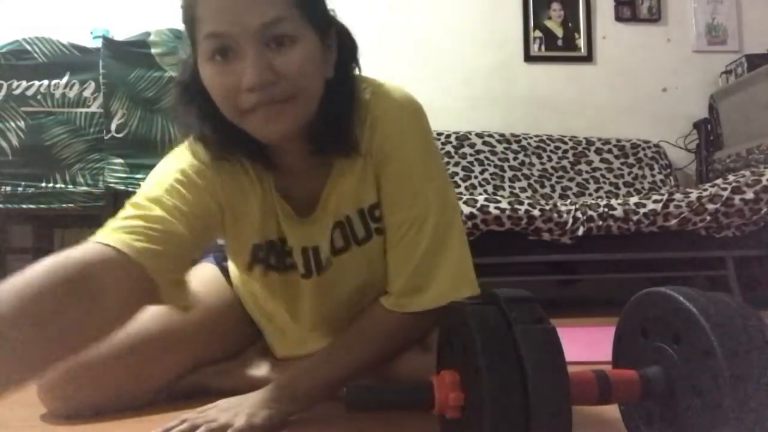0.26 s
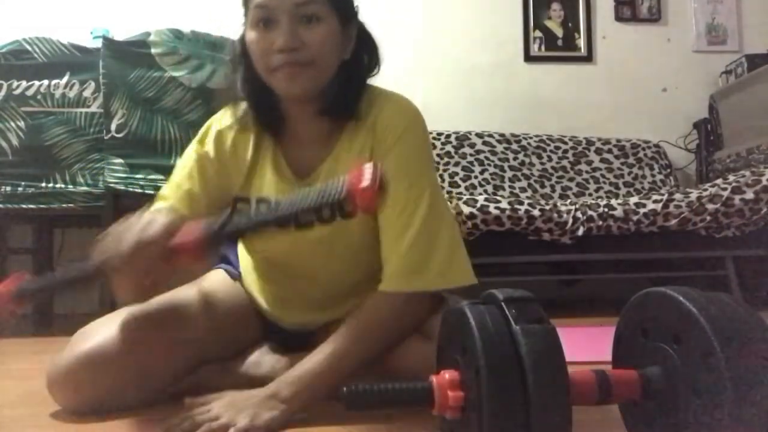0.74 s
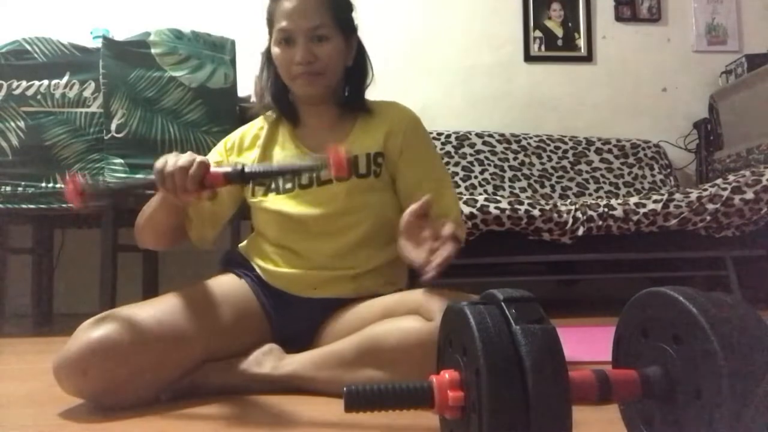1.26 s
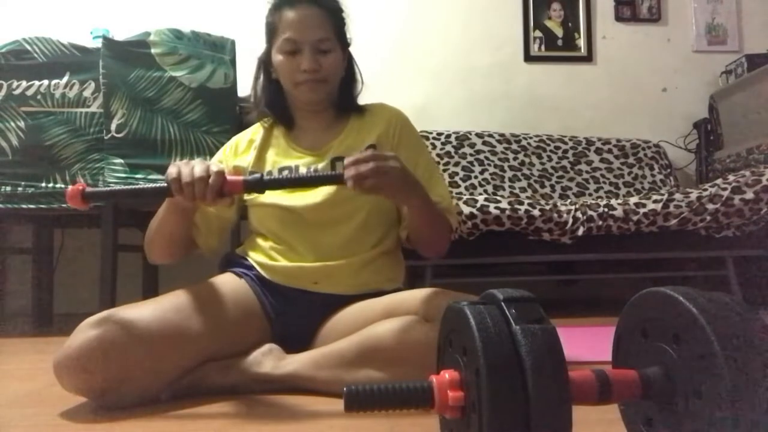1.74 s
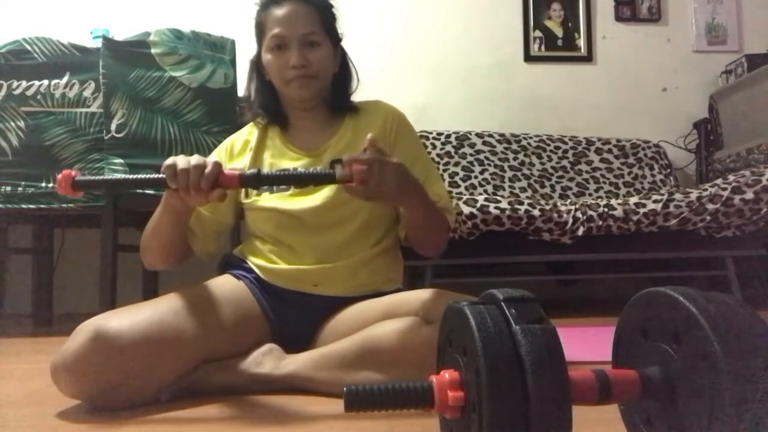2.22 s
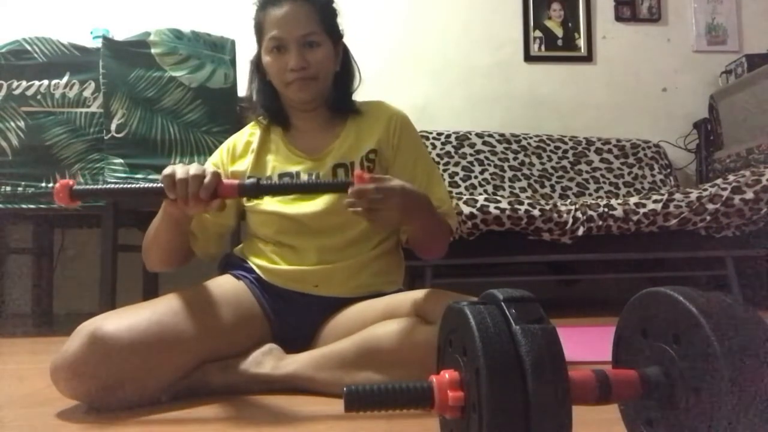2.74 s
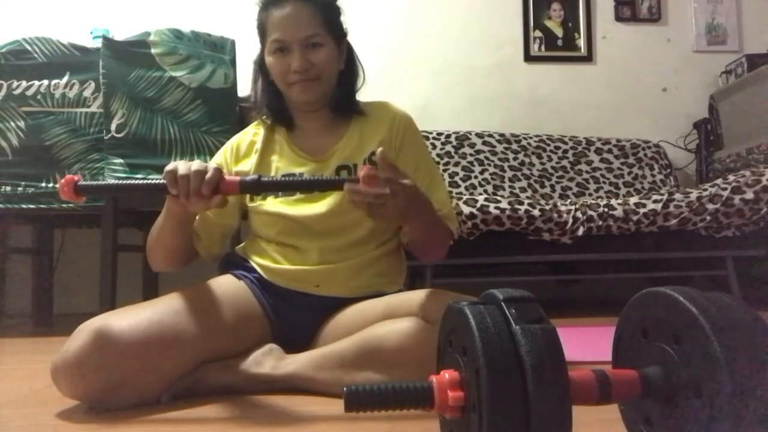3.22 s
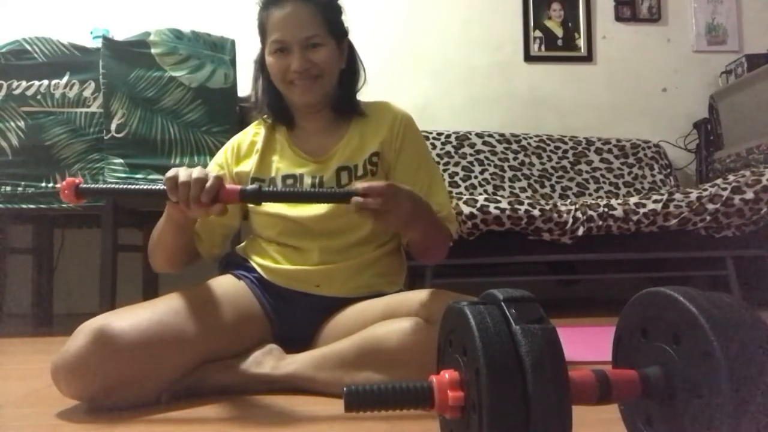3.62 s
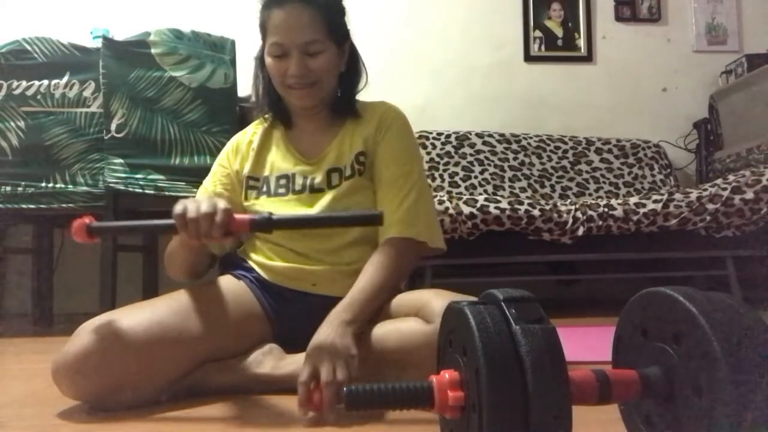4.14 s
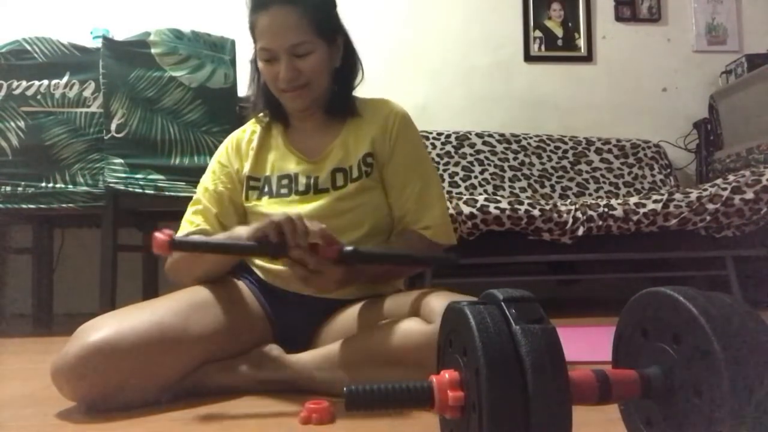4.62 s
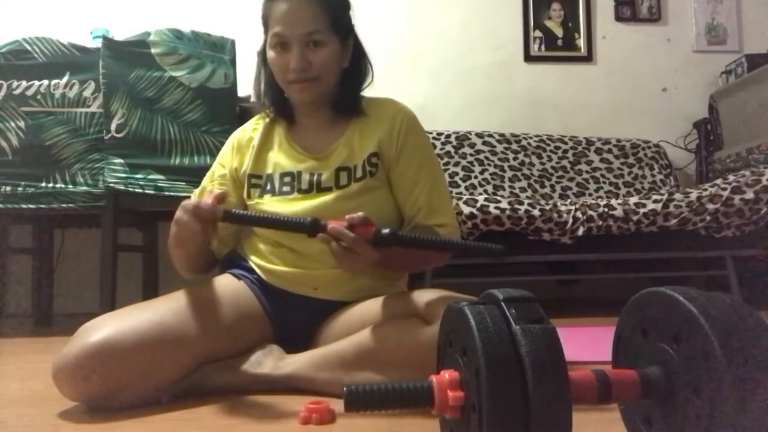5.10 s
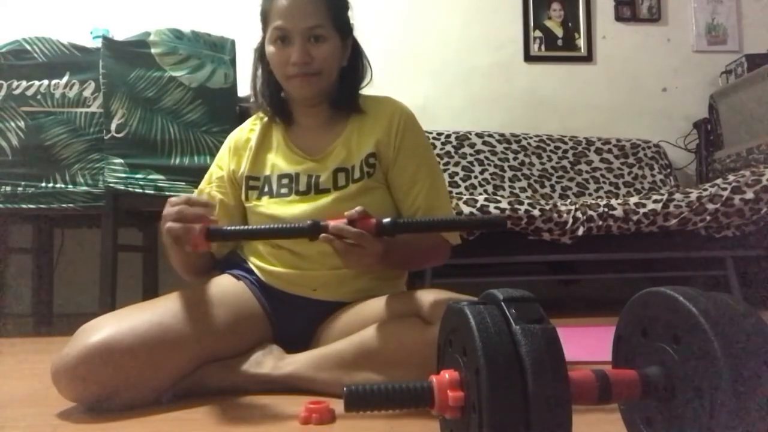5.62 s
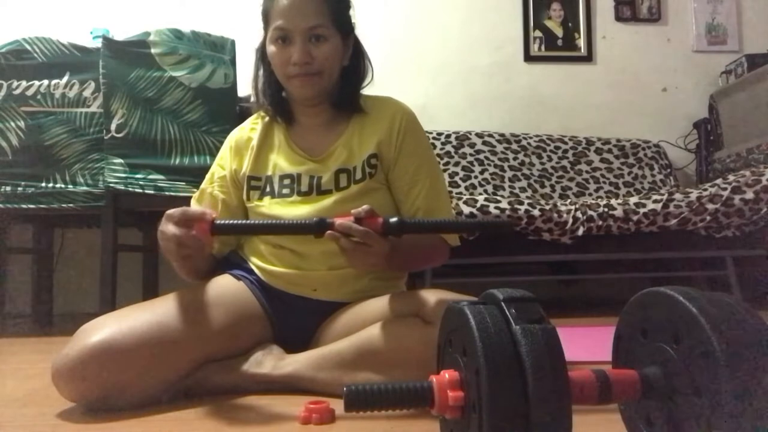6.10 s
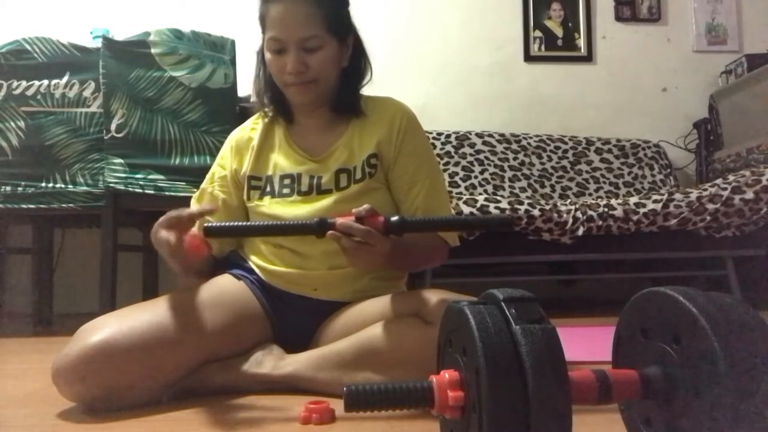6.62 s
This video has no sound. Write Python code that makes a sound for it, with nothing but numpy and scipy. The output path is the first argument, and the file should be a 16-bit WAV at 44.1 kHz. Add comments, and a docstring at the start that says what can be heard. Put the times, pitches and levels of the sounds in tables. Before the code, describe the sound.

Washing machine drone behind close handling of a hollow bar. First a brief scrape and a rattling pick-up, then faint rustles, clicks and dry thread rasps at arm's length. Midway a hard plastic nut clatters on the floor very near the microphone, far louder than everything else, bouncing several times. Soft rasping resumes; near the end the hum stops abruptly and the rumble sinks away in a small reverberant room.

```python
"""First a washing machine hums and rumbles in a small room while a bar scrapes to rest on the floor.
Close by, plastic collar nuts are screwed off the hollow dumbbell bar, which knocks and rasps; clothes rustle.
One nut drops near the microphone and bounces on the hard floor; later the motor cuts out and runs down.
The machine is tones and coloured noise, knocks and bounces are decaying modes with a noise crack,
the rasp is random ticks ringing the bar, and the scrape and cloth are shaped noise."""
import sys
import numpy as np
from scipy import signal
from scipy.fft import rfft, irfft
from scipy.io import wavfile

SR = 44100
rng = np.random.default_rng(int(sys.argv[2]) if len(sys.argv) > 2 else 0)


def materialize(psi):
    """Save the field psi as 16-bit PCM at rate SR to the path in sys.argv[1].

    A 1-D psi becomes a single channel; in a 2-D psi each row is a channel.
    """
    bounded = np.clip(np.atleast_2d(psi).T, -1, 1)
    quanta = np.round(bounded * 32767).astype(np.int16)
    wavfile.write(sys.argv[1], SR, quanta)


N = 302526   # length in samples
TIME_S = np.arange(N) / SR


def from_db(db):
    """Decibels to an amplitude ratio."""
    return 10 ** (np.asarray(db) / 20)


def rms_one(x):
    """Scale a signal to rms 1."""
    return x / np.sqrt(np.mean(x ** 2) + 1e-20)


def at_hz(points, hz):
    """Read a table on a log-frequency axis."""
    freqs, values = np.transpose(points)
    return np.interp(np.log(np.maximum(hz, 1)), np.log(freqs), values)


def noise(spectrum):
    """Noise of a given colour, rms 1, falling steeply below the table's first point."""
    hz = np.fft.rfftfreq(N, 1 / SR)
    low_cut = np.minimum(hz / spectrum[0][0], 1) ** 4
    colour = from_db(at_hz(spectrum, hz)) * low_cut
    return rms_one(irfft(rfft(rng.standard_normal(N)) * colour, N))


def drift(rate_hz):
    """Random wandering of rms 1: straight lines between two random knots per cycle of the rate."""
    knots = rng.standard_normal(int(N / SR * rate_hz * 2) + 2)
    return rms_one(np.interp(TIME_S * rate_hz * 2, np.arange(len(knots)), knots))


def soften(x, hz):
    """A softer contact has less treble: a first-order low-pass."""
    return signal.sosfilt(signal.butter(1, np.clip(hz, 50, .45 * SR), fs=SR, output="sos"), x)


def add(out, start_s, sound):
    """Mix a sound in at its start time, trimming what falls outside the scene."""
    i = round(start_s * SR)
    sound = sound[max(-i, 0):N - i]
    out[max(i, 0):max(i, 0) + len(sound)] += sound


def strike(modes, ratio, bright_hz, crack, crack_hz, crack_s, scatter_db=4.0):
    """One contact, peak 1: a short dry crack and every mode with a strength of its own."""
    t = np.arange(SR // 4) / SR
    hz, level_db, t60 = np.transpose(modes)[:, :, None]
    signs = (-1) ** np.arange(len(hz))[:, None]
    gains = signs * from_db(level_db + scatter_db * rng.standard_normal(hz.shape))
    decays = from_db(-60 * t / t60)
    rings = np.sum(gains * decays * np.sin(2 * np.pi * hz * ratio * t), axis=0)
    burst = rng.standard_normal(len(t)) * np.exp(-t / crack_s)
    top_hz = min(crack_hz + bright_hz, SR / 2 - 1000)   # a harder contact cracks over a wider band
    burst = signal.sosfilt(signal.butter(2, [crack_hz, top_hz], "band", fs=SR, output="sos"), burst)
    sound = soften(rings, bright_hz) + crack * burst
    return sound / np.abs(sound).max()


def swell(length_s):
    """A hand movement speeds up and slows down: half a sine."""
    return np.sin(np.linspace(0, np.pi, max(int(length_s * SR), 8)))


SHAFT_HZ, MAINS_HZ = 27.85, 60.08
CUT_S = 6.3   # the motor loses its supply
RUMBLE_DB = -33.5   # the cabinet while the motor drives
# after the cut: time constant of the speed, drop as the drive lets go, further fall
COAST_S, LET_GO_DB, RUN_DOWN_DB_PER_S = 0.8, 2.0, 34
# imbalance of the drive: (multiple of the shaft rate [ratio], level [dB])
SHAFT_ORDERS = [(2, -51.5), (3, -54), (5, -47.5), (6, -42), (7, -58), (8, -46.5), (9, -49.5), (10, -59.5),
                (11, -55), (12, -53.5), (13, -54), (14, -71), (15, -64.5), (16, -55.5), (17, -64)]
# magnetic hum: (multiple of mains [ratio], plus multiple of shaft rate [ratio], level [dB])
HUM = [(2, 0, -34.5), (2, 1, -39.5), (4, 0, -48)]
# colour of the cabinet rumble: (frequency [Hz], relative density [dB per Hz])
RUMBLE_COLOUR = [(35, -33), (48, -24), (60, -7.5), (105, -11.5), (145, 1.5), (200, -13), (300, -7),
                 (400, -17.5), (540, -26), (800, -32.5), (1200, -34), (1750, -53), (3000, -47.5),
                 (8000, -67)]
# panels that sing while the motor drives: (frequency [Hz], width [Hz], level [dB])
PANELS = [(1200, 200, -57.5), (1408.6, 30, -53)]


def washer(waver_db=1.5, hum_waver_db=0.96, slip_rad=0.41, hum_fade_s=0.09, panel_fade_s=0.023):
    """Shaft orders and rumble run down after the supply is cut; hum and panel ring die quickly."""
    since_cut = np.maximum(TIME_S - CUT_S, 0)
    speed = np.exp(-since_cut / COAST_S)
    drive = np.exp(-since_cut / panel_fade_s)
    hum_fade = np.exp(-since_cut / hum_fade_s)
    shake = from_db(-LET_GO_DB * (1 - drive) - RUN_DOWN_DB_PER_S * since_cut)
    angle = 2 * np.pi * SHAFT_HZ * np.cumsum(speed) / SR
    out = from_db(RUMBLE_DB) * shake * noise(RUMBLE_COLOUR)
    for order, db in SHAFT_ORDERS:   # the shifting load makes each order waver
        tone = np.sin(order * angle + rng.uniform(0, 2 * np.pi) + slip_rad * drift(3))
        out += np.sqrt(2) * from_db(db + waver_db * drift(4.4)) * shake * tone
    for mains, order, db in HUM:   # the off-centre rotor puts a sideband on the hum
        phase = 2 * np.pi * mains * MAINS_HZ * TIME_S + order * angle
        tone = np.sin(phase + rng.uniform(0, 2 * np.pi))
        out += np.sqrt(2) * from_db(db + hum_waver_db * drift(3)) * hum_fade * tone
    for hz, width_hz, db in PANELS:
        ring = signal.lfilter(*signal.iirpeak(hz, hz / width_hz, fs=SR), rng.standard_normal(N))
        out += from_db(db) * drive * rms_one(ring)
    return out


AIR_DB, WHINE_HZ, WHINE_DB = -52, 2430, -67
# colour of the still room: (frequency [Hz], relative density [dB per Hz])
AIR_COLOUR = [(40, -13), (120, 3.5), (400, 4.5), (800, -4), (1600, -8), (2600, -7), (4200, -7.5),
              (4900, -14), (5800, -11), (8000, -14), (11500, -18), (16000, -20)]


def still_room():
    """Even hiss of the room with a thin electrical whine."""
    whine = np.sqrt(2) * np.sin(2 * np.pi * WHINE_HZ * TIME_S)
    return from_db(AIR_DB) * noise(AIR_COLOUR) + from_db(WHINE_DB) * whine


# colour of the bar dragging on the floor: (frequency [Hz], relative density [dB per Hz])
DRAG_COLOUR = [(550, -10), (800, -0.5), (1100, -13), (1500, -10), (1850, -2), (2200, -10), (2400, -4),
               (2700, -18.5), (6000, -23), (16000, -25)]


def drag(db=-35, fade_s=0.034, grain_db=3):
    """A rough scrape, grainy noise, dies away as the bar comes to rest on the floor."""
    return from_db(db + grain_db * drift(115)) * np.exp(-TIME_S / fade_s) * noise(DRAG_COLOUR)


# cloth and skin slide: (time [s], length [s], level at mid-stroke [dB], brightness [Hz])
SWISHES = [(-.06, .17, -51, 9000), (.386, 0.052, -43.5, 14000), (.42, 0.26, -57, 6000),
           (0.666, .14, -54, 15000), (.92, 0.24, -55, 12000), (1.824, 0.15, -56, 4000),
           (5.165, 0.087, -55, 5000), (6.238, 0.079, -48, 4000)]
# colour of the cloth: (frequency [Hz], relative density [dB per Hz])
CLOTH_COLOUR = [(500, -10.5), (1500, -12), (3000, -6), (6500, -3), (9000, -8.5), (12500, -1), (16000, -7)]


def clothes(grain_db=2.5):
    """Grainy hiss under each arm movement."""
    out = np.zeros(N)
    hiss = noise(CLOTH_COLOUR) * from_db(grain_db * drift(120))
    for start_s, length_s, db, bright_hz in SWISHES:
        push = np.zeros(N)
        add(push, start_s, swell(length_s))
        out += from_db(db) * push * rms_one(soften(hiss, bright_hz))
    return out


# where the bar is held; on the floor, in one hand, in the other: (from time [s], pitch [ratio])
GRIPS = [(0, .87), (1.1, 1.0), (4.8, 1.09)]


def grip_ratio(s):
    """Pitch of the bar in the grip that holds at time s."""
    return [ratio for start_s, ratio in GRIPS if start_s <= s][-1]


# modes of the hollow bar: (frequency at grip ratio 1 [Hz], relative level [dB], t60 [s])
BAR_MODES = [(1122, -1.5, 0.052), (1290, -13, 0.059), (1493, -4, 0.014), (2080, -1.5, 0.03),
             (2260, -9.5, 0.0083), (3130, -7.5, 0.024), (3804, -4, 0.017), (5270, -3.5, 0.0089),
             (7050, -12, 0.013), (8650, -8, .008), (11500, -5, 0.0046)]
# knocks on the bar: (time [s], peak level [dB], contact brightness [Hz], dry crack strength [ratio])
KNOCKS = [(.3467, -36, 14000, 5), (.4443, -21, 3500, 3), (.456, -23, 3000, 3), (.4612, -30, 1500, 2.7),
          (.5384, -35.5, 5000, 8), (2.232, -21, 2190, 4.3), (2.3118, -36, 1500, .4),
          (2.759, -32, 2500, .75), (3.2572, -32, 1200, .8), (3.3627, -31, 3500, 0.96),
          (3.4125, -33.5, 6900, 3.8), (3.4317, -29.5, 6500, 1.5), (3.692, -31.5, 900, .4),
          (3.7085, -24, 3500, .5), (6.5285, -29.5, 3000, .65), (6.5996, -32, 2200, .4),
          (6.6244, -27.5, 900, 1.5)]
# a nut runs along the thread: (time [s], length [s], level [dB], contact brightness [Hz])
TURNS = [(1.828, 0.091, -52, 12000), (1.926, 0.15, -52.5, 1500), (2.228, 0.13, -49, 2000),
         (2.712, .075, -48, 3000), (2.811, .37, -54, 600), (3.249, .29, -49, 1200),
         (5.169, 0.071, -55, 5000), (5.636, .14, -50.5, 3000), (6.109, 0.08, -54, 4006),
         (6.512, 0.17, -47, 2999)]


def bar(ticks_per_s=200):
    """Single knocks, and the thread's dense little slips, ring the same tube."""
    out = np.zeros(N)
    for start_s, db, bright_hz, crack in KNOCKS:
        knock = strike(BAR_MODES, grip_ratio(start_s), bright_hz, crack, crack_hz=1380, crack_s=0.0044)
        add(out, start_s, from_db(db) * knock)
    for start_s, length_s, db, bright_hz in TURNS:
        push = swell(length_s)
        ticks = rng.random(len(push)) < ticks_per_s / SR
        slips = push * ticks * rng.standard_normal(len(push))
        tick = strike(BAR_MODES, grip_ratio(start_s), bright_hz, crack=0.65, crack_hz=1100, crack_s=0.00091)
        rasp = signal.fftconvolve(slips, tick)
        # level counts the whole energy over the length of the turn
        add(out, start_s, from_db(db) * rasp / np.sqrt(np.sum(rasp ** 2) / len(push) + 1e-20))
    return out


LIFT_S = .447   # one end of the bar chatters on the floor as it is picked up
# modes of the floor covering: (frequency [Hz], relative level [dB], t60 [s])
FLOOR_MODES = [(1077, -3.5, 0.078), (1230, -9, .02), (1583, -6, 0.019), (1960, -8, .03), (2090, -13.5, .03),
               (2350, -7, 0.012), (2680, -11, .012)]


def lift(db=-24.5, period_s=.0058, count=5, growth_db=0.4, jitter_s=0.00034):
    """A quick run of skips, each a little stronger, sets the floor covering ringing."""
    out = np.zeros(N)
    for k in range(count):
        skip = strike(FLOOR_MODES, 1, 3000, crack=0.26, crack_hz=1200, crack_s=0.0018)
        skip_s = LIFT_S + k * period_s + rng.normal(0, jitter_s)
        add(out, skip_s, from_db(db + k * growth_db) * skip)
    return out


NUT_CRACK, CRACK_GROWTH = 0.21, 1.0   # dry crack at 0 dB; dB it gains per dB that a bounce is weaker
LOBE_DB, LOBE_BRIGHT_HZ = -3.5, 2500   # the second lobe is weaker; its contact brightness
REBOUND_S, REBOUND_DB = .0035, -9.5   # the struck lobe slaps down once more
# modes of the plastic nut: (frequency before the nut's pitch ratio [Hz], relative level [dB], t60 [s])
NUT_MODES = [(1910, -22.5, 0.012), (2920, -13, 0.0075), (3150, -15, .02), (3390, -12, 0.015),
             (3813, -7, 0.026), (4000, -2, 0.023), (4260, -1, 0.025), (5460, -21, 0.0063),
             (6580, -28, 0.0077), (9040, -18.5, 0.021), (11470, -13, 0.012), (12700, -15, 0.0099),
             (14010, -15, .007), (15400, -19, .007)]
# the nut bounces on the floor; a second lobe touches later, or earlier if negative:
# (time [s], peak level [dB], contact brightness [Hz], second lobe delay [s])
BOUNCES = [(4.2265, -8.5, 2020, -.0012), (4.2825, -1, 11000, 0.0068), (4.3928, -1, 11000, -.0042),
           (4.4632, -5, 14000, -.004), (4.5026, -12.5, 7500, .0063), (4.5405, -22, 1200, .003)]


def dropped_nut(ratio=0.986, floor_hz=930, floor_db=-26, floor_t60=0.021):
    """Each bounce is a slap, its rebound and a second lobe; weak ones crack more; the first knocks the floor."""
    out = np.zeros(N)
    for start_s, db, bright_hz, lobe_s in BOUNCES:
        crack = NUT_CRACK * from_db(-CRACK_GROWTH * db)
        touches = [(0, 0, bright_hz), (REBOUND_S, REBOUND_DB, bright_hz), (lobe_s, LOBE_DB, LOBE_BRIGHT_HZ)]
        for delay_s, touch_db, touch_hz in touches:
            slap = strike(NUT_MODES, ratio, touch_hz, crack, crack_hz=1670, crack_s=0.0019)
            add(out, start_s + delay_s, from_db(db + touch_db) * slap)
    floor_mode = [(floor_hz, 0, floor_t60)]
    thud = strike(floor_mode, 1, 1000, crack=0.74, crack_hz=590, crack_s=0.00092)
    add(out, BOUNCES[0][0], from_db(floor_db) * thud)
    return out


def shudder(hz=86, db=-30.0206, rise_s=0.024):
    """The tub lurches on its springs as the drive lets go: a low tone that rises and dies."""
    age = np.maximum(TIME_S - CUT_S, 0)
    envelope = age / rise_s * np.exp(1 - age / rise_s)   # peaks at 1 after rise_s
    return from_db(db) * envelope * np.sin(2 * np.pi * hz * age)


# decay of the small room: (frequency [Hz], t60 [s])
ROOM_T60 = [(500, 0.33), (2200, 0.46), (3100, 0.52), (4100, 0.26), (9000, 0.4), (16000, 0.16)]


def room(x, build_up_s=0.0054):
    """Dense reflections: bands of noise, each dying at its own rate."""
    t = np.arange(SR * 3 // 5) / SR
    edges = np.geomspace(300, 18000, 17)
    tail = np.zeros(len(t))
    for low, high in zip(edges, edges[1:]):
        band_filter = signal.butter(2, [low, high], "band", fs=SR, output="sos")
        band = signal.sosfilt(band_filter, rng.standard_normal(len(t)))
        tail += band * np.exp(-np.log(1000) * t / at_hz(ROOM_T60, np.sqrt(low * high)))
    tail *= np.clip(t / build_up_s, 0, 1)
    return signal.fftconvolve(x, tail / np.sqrt(np.sum(tail ** 2)))[:N]


def scene(bar_wet_db=-6, nut_wet_db=-10, lift_wet_db=-11):
    """The nut falls near the microphone; the bar is held farther off and sounds wetter."""
    handling = bar() + drag() + clothes()
    nut, chatter = dropped_nut(), lift()
    to_room = from_db(bar_wet_db) * handling + from_db(nut_wet_db) * nut + from_db(lift_wet_db) * chatter
    background = washer() + shudder() + still_room()
    return (background + handling + nut + chatter + room(to_room))[None]


PORT_NOTCH_HZ, PORT_NOTCH_Q, PORT_NOTCH_DEPTH = 10300, 8, 0.42   # depth: share taken out at the centre
CUTOFF_HZ = 16100


def record(dry):
    """The microphone port notches the treble; full scale stops the peaks; the top is cut."""
    port = signal.lfilter(*signal.iirpeak(PORT_NOTCH_HZ, PORT_NOTCH_Q, fs=SR), dry)
    heard = np.clip(dry - PORT_NOTCH_DEPTH * port, -1, 1)
    return signal.sosfilt(signal.ellip(12, .1, 80, CUTOFF_HZ, fs=SR, output="sos"), heard)


dry = scene()
out = record(dry)
materialize(out)
```